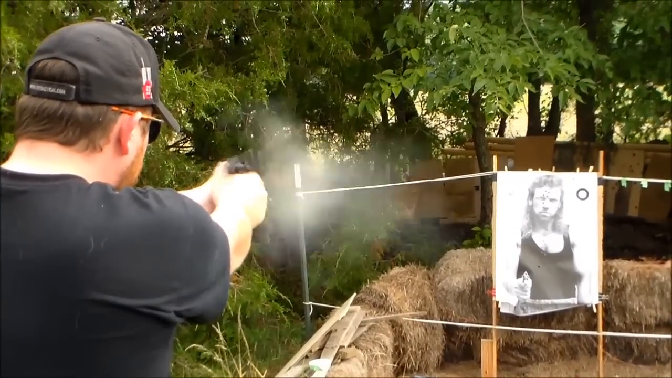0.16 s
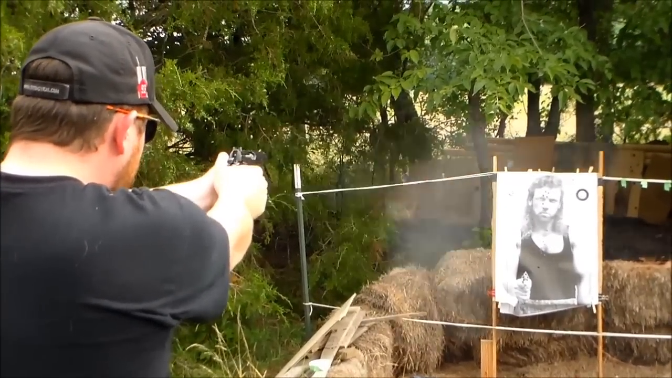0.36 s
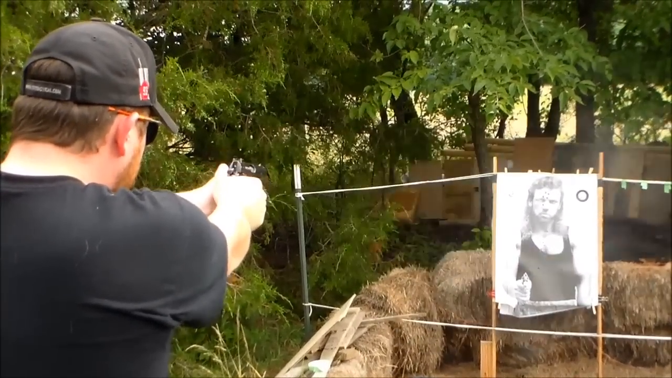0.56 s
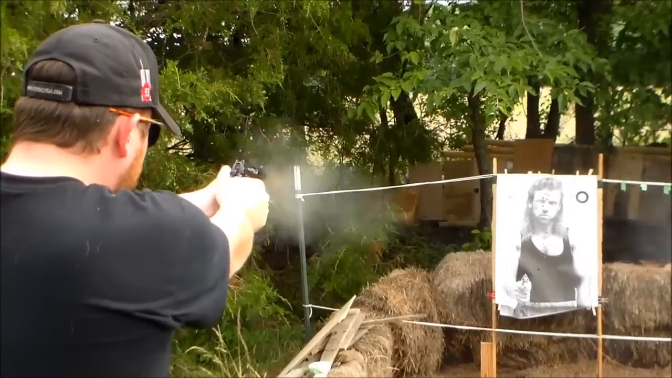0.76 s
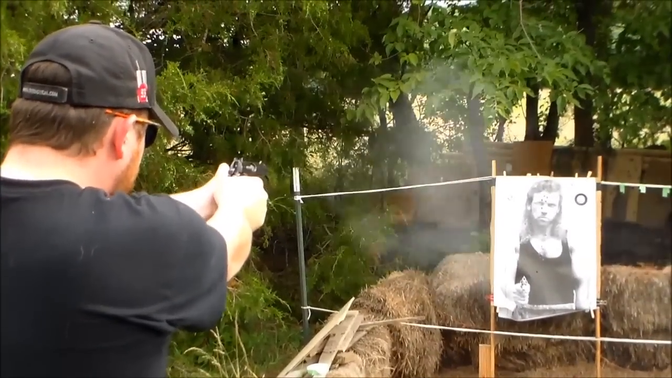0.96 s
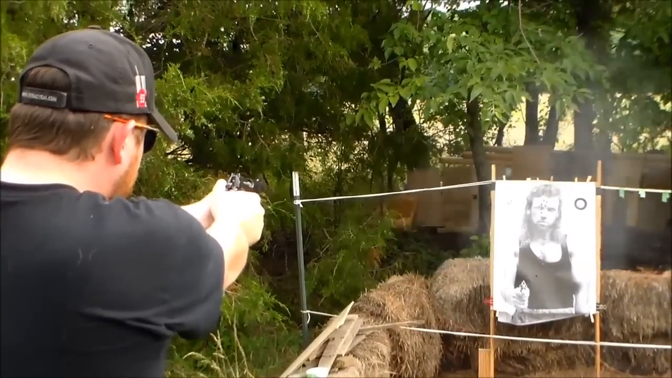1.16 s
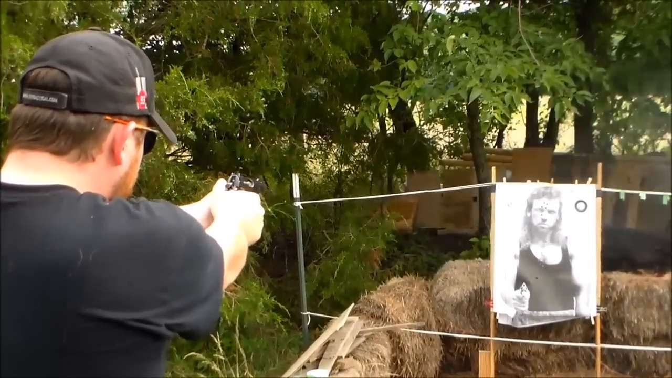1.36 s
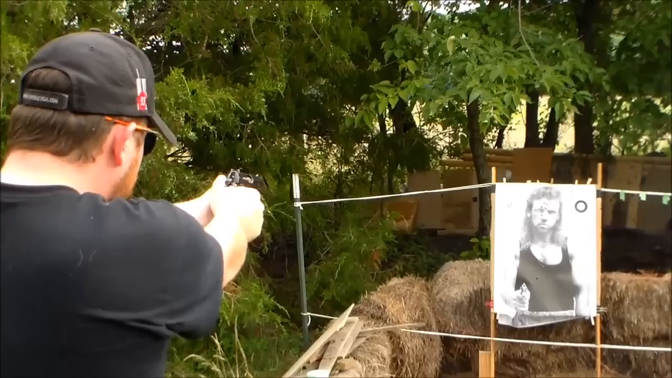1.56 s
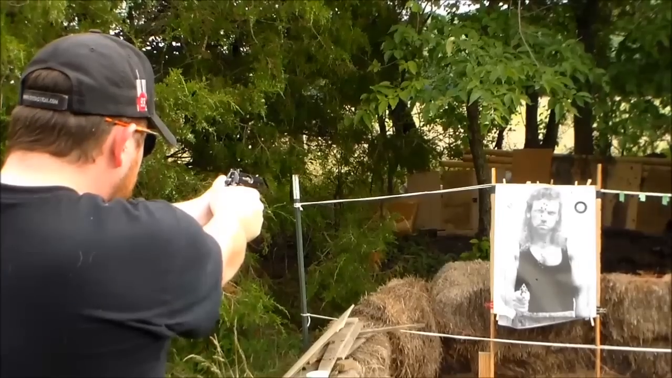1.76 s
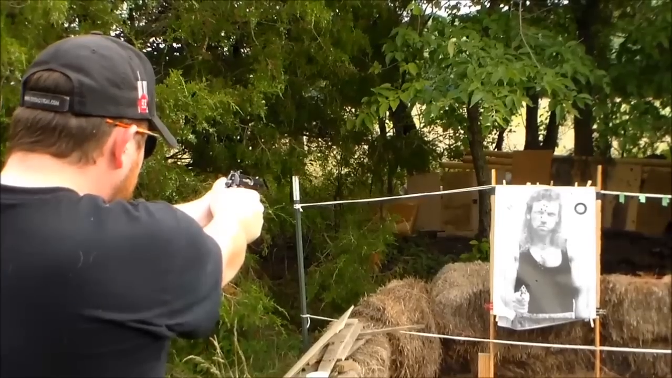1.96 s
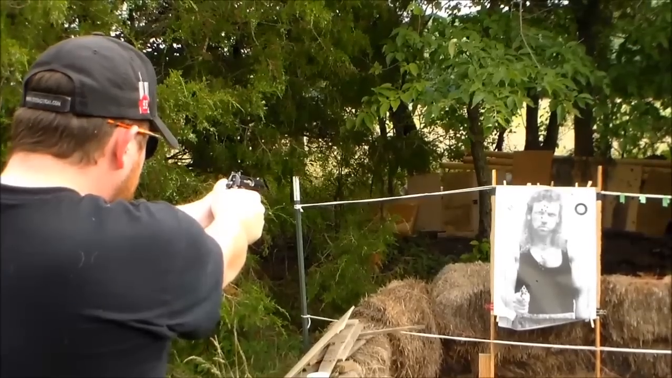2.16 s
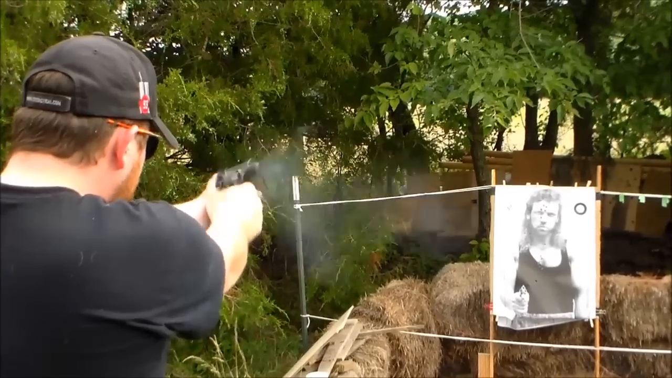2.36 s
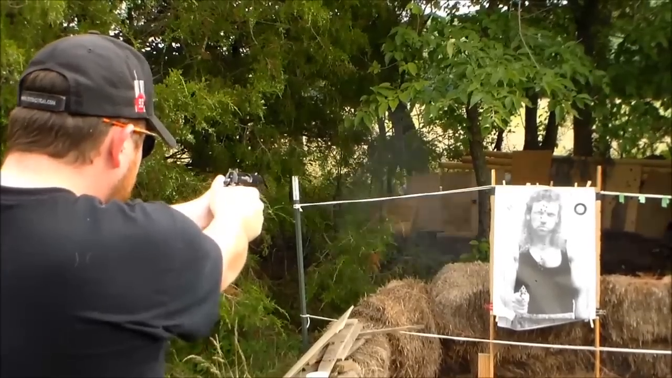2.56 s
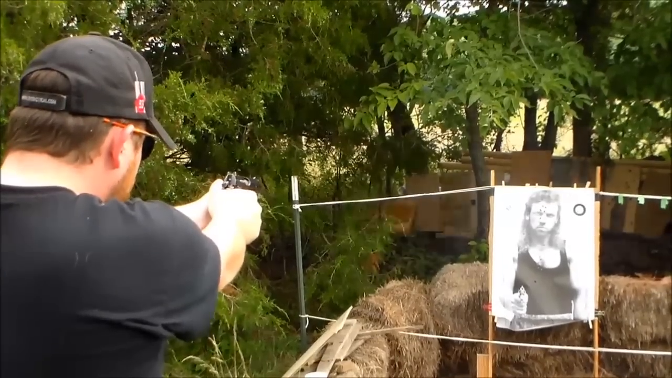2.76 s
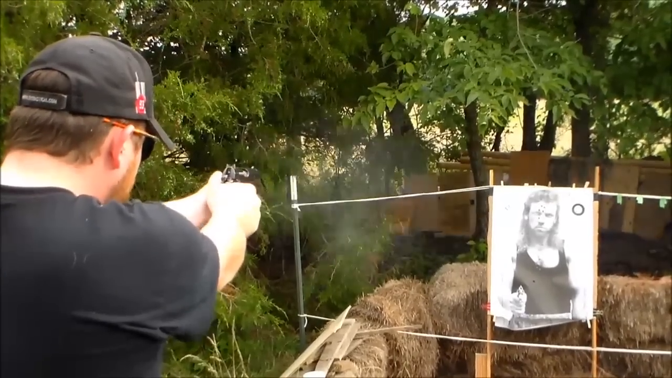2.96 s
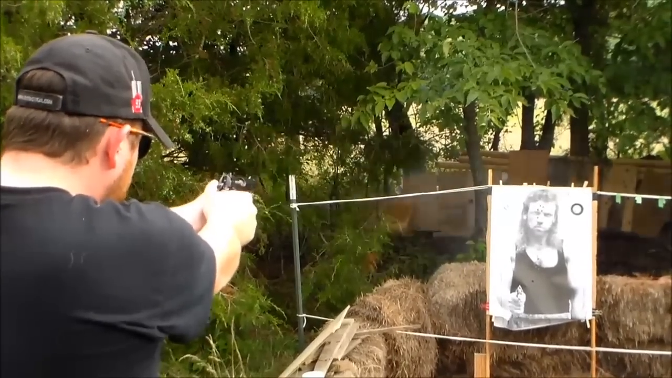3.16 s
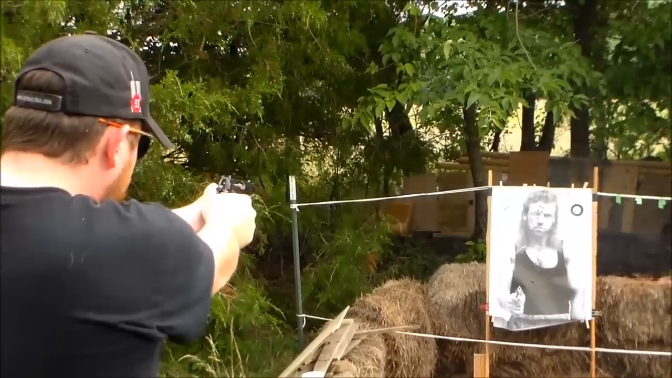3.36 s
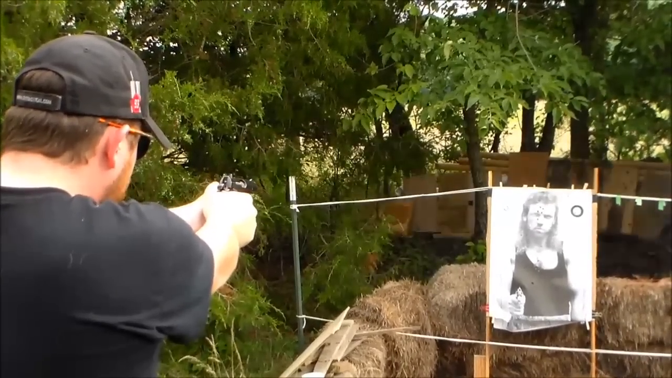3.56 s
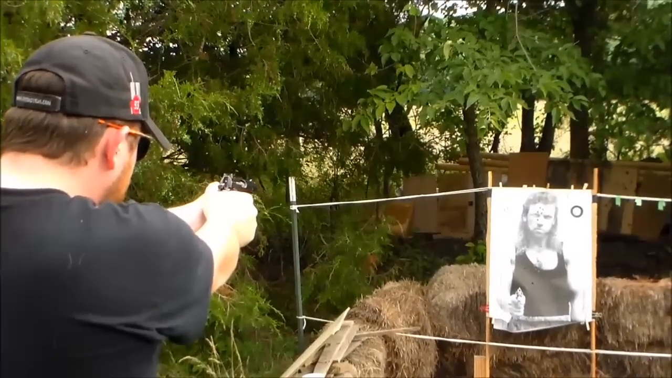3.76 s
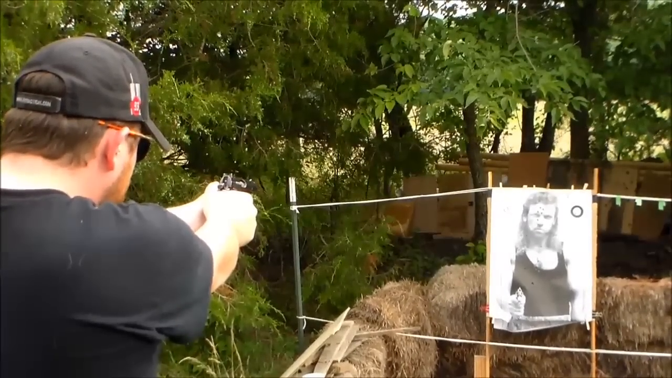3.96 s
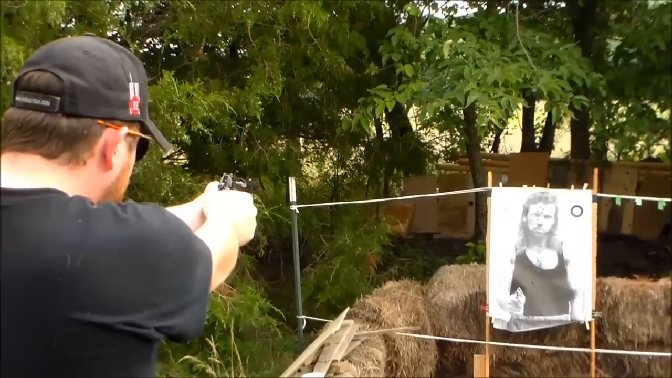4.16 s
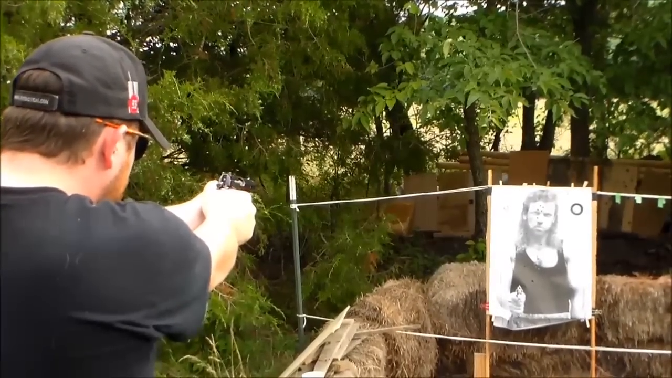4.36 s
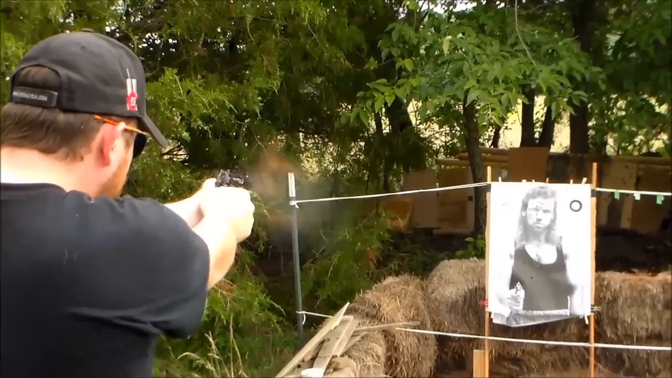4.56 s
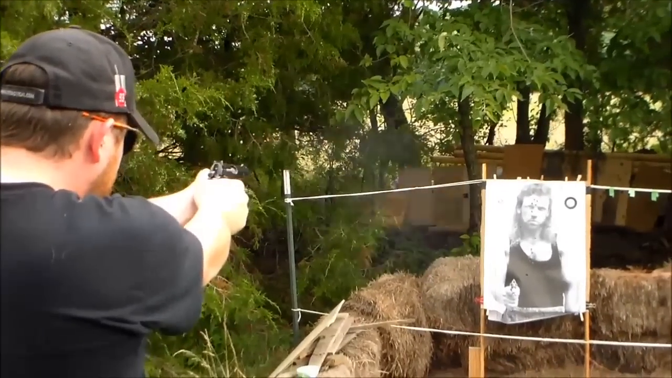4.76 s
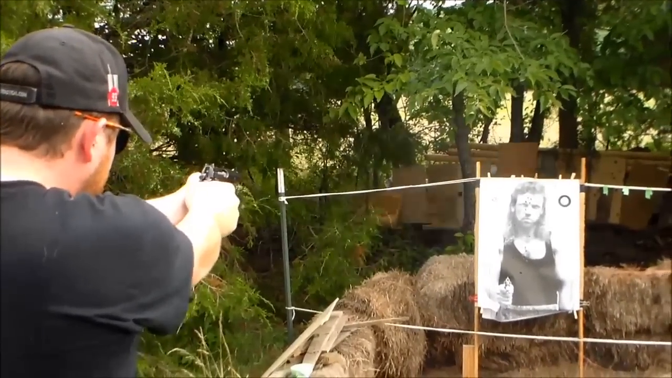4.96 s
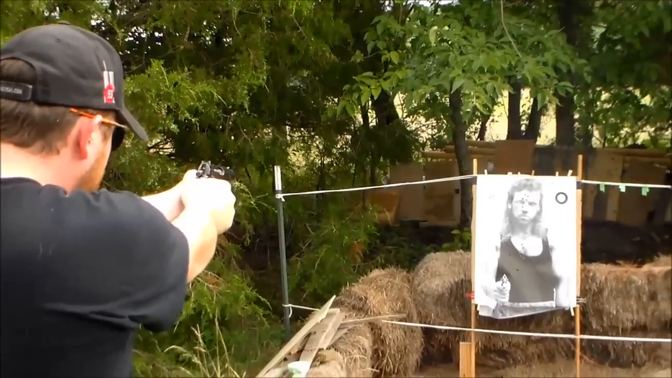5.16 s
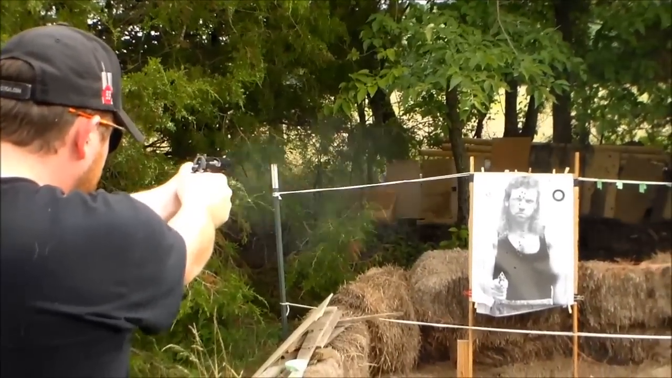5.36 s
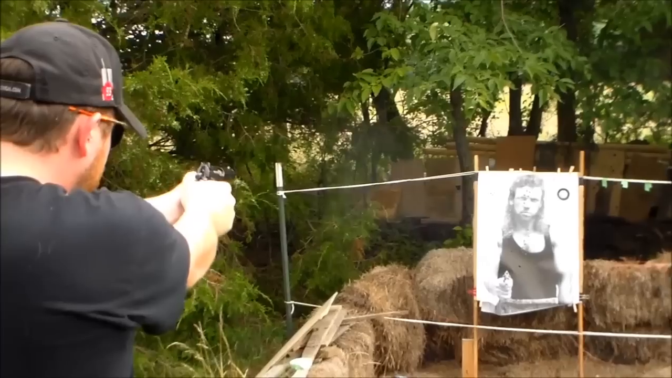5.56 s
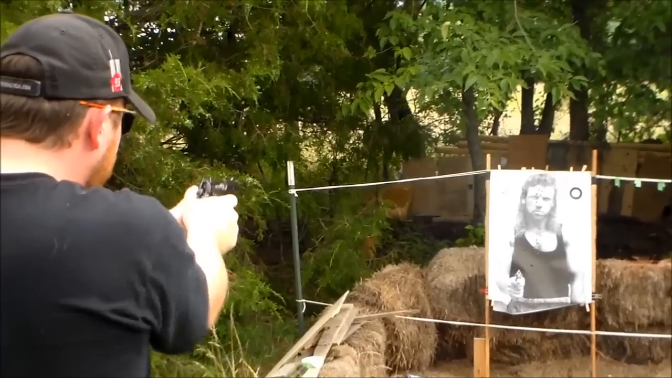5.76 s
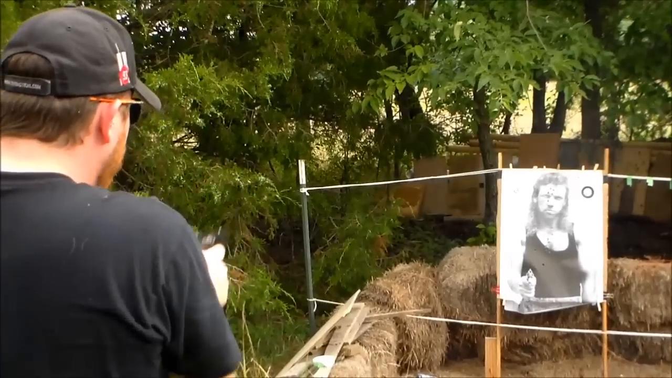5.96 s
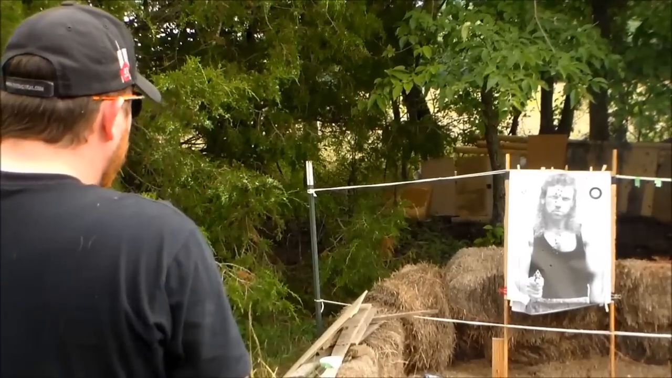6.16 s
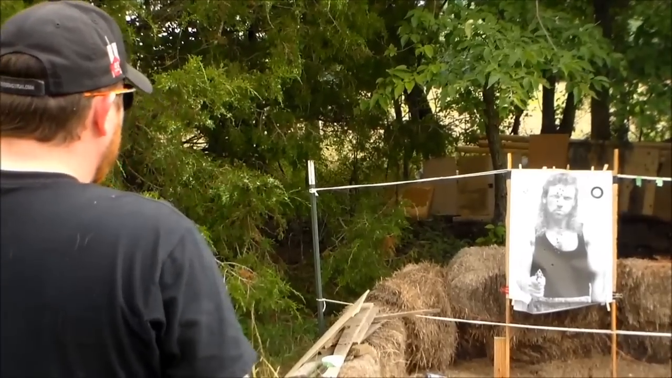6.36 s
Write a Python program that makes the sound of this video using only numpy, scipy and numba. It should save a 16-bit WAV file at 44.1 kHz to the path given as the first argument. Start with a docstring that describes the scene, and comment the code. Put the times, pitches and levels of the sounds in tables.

```python
"""Wind and summer hiss open the scene, then a pistol close to the microphone fires three pairs of shots outdoors.
Each blast, a boom plus thumps and noise cracks, overloads the microphone and slaps back from the target bank.
Coloured noise then scatters from trees and straw, rolls through distant woods and slaps off a far tree line.
The gain control ducks under the shots and lets go late, lifting far echo, wind and hiss; spent cases tinkle
in the gaps between pairs, and a last gust bumps the microphone."""
import sys
import numpy as np
from scipy import signal
from scipy.fft import rfft, irfft, next_fast_len
from scipy.io import wavfile
from numba import njit

SR = 44100
rng = np.random.default_rng(int(sys.argv[2]) if len(sys.argv) > 2 else 0)


def wrap_up_sound(samples):
    """Save the sound to the file named by the first command line argument, as 16-bit audio."""
    columns = np.atleast_2d(samples).T
    # keep every value between -1 and 1, then stretch to whole-number steps
    tamed = np.clip(columns, -1, 1)
    steps = np.round(tamed * 32767).astype(np.int16)
    wavfile.write(sys.argv[1], SR, steps)


N = 286473
TIME = np.arange(N) / SR  # s
ECHO_SIZE = 98304  # samples given to the echoes of one shot
DELAY = TIME[:ECHO_SIZE]  # s after a shot
PATH_DECAY_S = 0.0013  # decay of each arrival of the blast

# Stereo spread at the two close microphone ports. Each row: frequency in Hz, side minus mid in dB.
PORT_WIDTH = [(60, -18), (200, -10), (400, -15), (750, -19), (1300, -14.5), (2400, -12.5), (4400, -5),
              (8000, 3.5), (14000, -1)]


def undb(db):
    """Decibels to gain."""
    return 10 ** (np.asarray(db) / 20)


def at_hz(points, hz):
    """Read (Hz, value) points on a log-frequency axis."""
    f, value = np.transpose(points)
    return np.interp(np.log(hz), np.log(f), value)


def add(out, sound, s):
    """Mix a sound in from time s on."""
    start = max(int(round(s * SR)), 0)
    part = sound[..., :max(out.shape[1] - start, 0)]
    out[:, start:start + part.shape[-1]] += part


def waver(t, size):
    """Random levels, a new one every size samples, joined by straight lines."""
    knots = t[::size]
    return np.interp(t, knots, rng.standard_normal(len(knots)))


def swell(onset_s, build_s, top_db, fade_db_per_s):
    """Envelope of scattered sound: a straight rise, then an even fade."""
    age = DELAY - onset_s
    rise = np.clip(age / build_s, 0, 1)
    return rise * undb(top_db - fade_db_per_s * np.maximum(age - build_s, 0))


def noise(colour, size, width=None):
    """Stereo noise of a given colour, its mid at rms 1; without a width the two ports are unrelated."""
    length = next_fast_len(size, True)
    hz = np.maximum(np.fft.rfftfreq(length, 1 / SR), 1)
    gain = undb(at_hz(colour, hz))
    mid, side = rfft(rng.standard_normal((2, length))) * gain / np.sqrt(np.mean(gain ** 2))
    if width is not None:
        side = side * undb(at_hz(width, hz))
    return irfft(np.array([mid + side, mid - side]), length)[:, :size]


def burst(colour, db, spread_s):
    """A puff of coloured noise that peaks after spread_s (at least 0.5 ms) and fades."""
    age = TIME[:SR // 5] / max(spread_s, .0005)
    return undb(db) * noise(colour, len(age), PORT_WIDTH) * age * np.exp(1 - age)


def scatter(envelope, colour, loss, typical_s):
    """Countless small reflections whose colour shifts with travel time; it is as given at typical_s."""
    hz = np.maximum(np.fft.rfftfreq(ECHO_SIZE, 1 / SR), 1)
    spectrum = rfft(noise(colour, ECHO_SIZE, PORT_WIDTH))
    corners_hz = np.array(loss)[:, 0]
    out = 0
    # overlapping bands, one around each corner, each fading at its own rate
    for (_, db_per_s), own in zip(loss, np.eye(len(loss))):
        band = at_hz(np.column_stack([corners_hz, own]), hz)
        out = out + irfft(spectrum * band) * undb(-db_per_s * (DELAY - typical_s))
    return out * envelope


def summer_hiss():
    """Insects and foliage blend into a steady coloured noise, unrelated at the two ports."""
    # Colour of the hiss. Each row: frequency in Hz, relative level in dB.
    colour = [(200, -10.5), (500, -0.5), (1000, -1.5), (2200, -8.5), (2800, -8), (3300, -1), (4000, -8),
              (5400, -6), (7000, -16), (10000, -18), (14000, -18)]
    return undb(-62) * noise(colour, N)


def wind():
    """Eddies rumble at each port, louder in the gusts; now and then one bumps the microphone."""
    # Colour of the rumble. Each row: frequency in Hz, relative level in dB.
    colour = [(20, -2), (50, 1), (100, -0.5), (170, -5.5), (260, -18), (400, -26.5), (800, -46),
              (2000, -63)]
    # Gusts over the breeze. Each row: start in seconds, length in seconds, level in dB before flutter.
    gusts = [(0, 0.33, -44), (1.993, 0.78, -47), (4.06, .74, -50), (6.151, .4, -42)]
    # Single bumps. Each row: start in seconds, level in dB, upper edge in Hz.
    bumps = [(.172, -37.5, 244), (2.221, -34, 200), (2.317, -36.5, 195), (6.236, -31.5, 400),
             (6.285, -34, 405), (6.404, -29.5, 300), (6.460, -33, 415), (6.478, -35.5, 297)]
    breeze_db, gust_rise_s, flutter_db = -53, 0.017, 4
    strength = undb(breeze_db)
    for start, length, db in gusts:
        inside = np.minimum(TIME - start, start + length - TIME)
        gust = undb(db) * np.clip(inside / gust_rise_s + .5, 0, 1)
        strength = np.maximum(strength, gust)
    out = noise(colour, N) * strength * undb(flutter_db * waver(TIME, size=900))
    for s, db, hz in bumps:
        bump_colour = [(hz / 4, -3), (hz, 0), (2 * hz, -22), (10 * hz, -70)]
        add(out, burst(bump_colour, db, spread_s=0.0045), s)
    return out


def cases():
    """Spent cases tinkle on the ground: brief puffs of high-pitched noise."""
    # Landings. Each row: start in seconds, level in dB.
    landings = [(2.168, -53), (4.305, -60)]
    # Colour of the tinkle. Each row: frequency in Hz, relative level in dB.
    colour = [(5000, -35), (8000, -14), (10000, 0), (13000, -6), (15000, 3)]
    out = np.zeros((2, N))
    for s, db in landings:
        add(out, burst(colour, db, spread_s=0.0022), s)
    return out


def woods(patchy_db=1.58):
    """The blast rolls around the distant woods; a far tree line returns slaps, some dulled among the leaves."""
    # The roll: first arrival in seconds, build-up in seconds, top in relative dB, common fade in dB per s.
    roll = (0.1783, 0.12, -25.5, 26.5)
    # Colour of the roll. Each row: frequency in Hz, relative level in dB.
    roll_colour = [(150, -30.5), (250, -9), (309, -13), (609, 3.5), (991, 1), (1090, 1.5), (1960, -11.5),
                   (2450, -9), (4050, -19.5), (4470, -24), (5790, -28.5), (6480, -33.5), (12000, -54),
                   (15600, -75), (22000, -120)]
    # Loss in the air on top of the common fade. Each row: frequency in Hz, loss in dB per s.
    air_loss = [(500, -17.5), (1000, -6.5), (3000, -4.5), (10000, 6.5)]
    # Far slaps. Each row: delay in seconds, relative level in dB, spread in seconds, share of treble kept 0-1.
    slaps = [(0.786, -38, 0.0098, 0.5), (0.8109, -26, 0.0009, 0.93), (0.853, -42, 0.0084, 1),
             (.8685, -26.5, .0011, 0), (0.877, -26.5, 0.0009, 0.11)]
    # Colour of an undulled slap. Each row: frequency in Hz, relative level in dB.
    slap_colour = [(300, -17), (700, -6), (1100, 17.5), (1900, -15), (2550, 9), (3500, 1), (5200, -1.5),
                   (7500, -17), (13000, -43)]
    out = scatter(swell(*roll), roll_colour, air_loss, typical_s=1.0)
    out = out * undb(patchy_db * waver(DELAY, size=500))
    for delay, db, spread, treble in slaps:
        dulling_db = 20 * np.log10(np.clip(treble, .05, 1))
        dulled = [(hz, level + dulling_db * (hz > 3000)) for hz, level in slap_colour]
        add(out, burst(dulled, db, spread), delay)
    return out


def trees(patchy_db=2.5, clumps_db=1.25):
    """Ground and near trees scatter unevenly, in clumps, with a hollow ring where reflections add in step."""
    # Ground, nearest trees and the stand behind them. Each row: first arrival in seconds,
    # build-up in seconds, top in relative dB, common fade in dB per s.
    scatterers = [(0, .009, 9.5, 319.5), (.044, 0.01, 6, 175), (0.089, .045, -3, 118)]
    # Colour of the scatter. Each row: frequency in Hz, relative level in dB.
    colour = [(88, -54), (150, -16.5), (286, -27.5), (352, -6.5), (387, -10.5), (525, -1.5), (659, 0.5),
              (797, -1), (1490, -2), (2020, -4), (2900, -5.5), (5630, -12), (6810, -17.5), (10900, -17.5),
              (14000, -31)]
    # Loss among the leaves on top of the common fade. Each row: frequency in Hz, loss in dB per s.
    leaf_loss = [(500, 2.7), (1000, 9), (2500, 33), (5000, 59), (12000, 69)]
    # Pitches that the reflectors' spacing reinforces or cancels.
    # Each row: frequency in Hz, width in Hz (20 at least is used), boost or cut in dB.
    reinforced = [(390, 24, -2), (534, 110, 1), (600, 11, -2), (725, 18, 1.5), (890, 40, 1.5),
                  (1005, 12, -5), (1051, 6.3, -2.5), (1010, 47, 3), (1290, 50, -0.5), (1250, 19, 2.5),
                  (1502, 8, -1), (1690, 26, -0.5), (2037, 210, -6.5), (2510, 37, 5), (3100, 17, -0.5),
                  (3496, 50, 8)]
    hz = np.fft.rfftfreq(ECHO_SIZE, 1 / SR)
    ring_db = sum(db / (1 + (2 * (hz - f) / max(width, 20)) ** 2) for f, width, db in reinforced)
    uneven = undb(patchy_db * waver(DELAY, size=60) + clumps_db * waver(DELAY, size=300))
    envelope = np.sqrt(sum(swell(*row) ** 2 for row in scatterers)) * uneven
    near = scatter(envelope, colour, leaf_loss, typical_s=0.037)
    return irfft(rfft(near) * undb(ring_db)) * (DELAY < 1)


def bales():
    """Straw bales scatter the blast into a short, bright rustle of noise."""
    # Colour of the rustle. Each row: frequency in Hz, relative level in dB.
    colour = [(200, -7.5), (1000, 1), (5000, -1.5), (14000, -7.5)]
    # The rustle: first arrival in seconds, build-up in seconds, top in relative dB, fade in dB per s.
    rustle = (0.025, 0.0034, 4.8, 300)
    return noise(colour, ECHO_SIZE, PORT_WIDTH) * swell(*rustle)


def echoes():
    """Spectrum of all that the range throws back after one shot."""
    return rfft(trees() + bales() + woods())


def thump(hz, db, decay_s):
    """A short, damped pressure oscillation."""
    t = TIME[:SR // 25]
    return undb(db) * np.cos(2 * np.pi * hz * t) * np.exp(-t / decay_s)


def reflection(thump_db, hz, crack_db, narrow_db=-5):
    """One arrival of the blast: a thump and a burst of crack, nearly alike at both ports."""
    # Colour of the crack. Each row: frequency in Hz, relative level in dB.
    colour = [(60, 7), (300, 0.5), (1300, 11.5), (2000, 1.5), (3400, 8), (6000, -1), (10000, -2.5),
              (15000, -22)]
    t = TIME[:SR // 25]
    width = [(f, db + narrow_db) for f, db in PORT_WIDTH]
    crack = undb(crack_db) * noise(colour, len(t), width) * np.exp(-t / PATH_DECAY_S)
    return thump(hz, thump_db, PATH_DECAY_S) + crack


def blast():
    """The muzzle booms; the blast arrives directly, off the ground, the target bank and a few near trunks."""
    # Low boom of the muzzle gas. Each row: frequency in Hz, relative level in dB, decay in seconds.
    boom = [(188, 13.5, 0.0044), (340, 23, .0035)]
    # The direct blast and its distinct near reflections. Each row: delay in seconds,
    # thump relative level in dB, thump frequency in Hz, crack relative level in dB.
    paths = [(0, 21, 1430, 39.5), (.0020, 24.5, 967, 24.5), (.0043, 22.5, 760, 33.5),
             (.0313, 32.5, 590, 7.5), (.0330, 22, 1034, 17.5), (.0600, 12.5, 1430, 7),
             (.0910, 7.5, 520, -4.5), (.1165, 9.5, 905, 1)]
    out = np.zeros((2, ECHO_SIZE))
    add(out, sum(thump(hz, db, decay_s) for hz, db, decay_s in boom), 0)
    for delay, thump_db, hz, crack_db in paths:
        add(out, reflection(thump_db, hz, crack_db), delay)
    return out


def surge(rise_s, onset_s=0.0062, length_s=0.047, coupling_hz=1.66):
    """The blast throws the microphone off centre; its coupling capacitors swing it slowly back."""
    push = -(1 + np.tanh((DELAY - onset_s) / rise_s)) / 2 * np.exp(-(DELAY / length_s) ** 2)
    b, a = signal.butter(1, coupling_hz, "high", fs=SR)
    return signal.lfilter(b, a, signal.lfilter(b, a, push))


def pistol():
    """Gun and surroundings stay put, so every shot has the same low echoes; the blast and their treble vary."""
    # Shots. Each row: start in seconds, gain of blast and echoes in dB, microphone surge level in dB,
    # surge rise in seconds, surge left minus right in dB.
    shots = [(0.3412, 1.5, 19, .003, 5.5), (0.9528, 1.5, 16.5, .005, 3.5), (2.53, 1.5, 22.5, .0007, -2),
             (3.0810, 1, 19, .0009, 4), (4.7555, 1, 21, 0.00051, 0), (5.4907, 1.5, 18.5, .0015, 0)]
    stable_hz = 2450  # above it, moving air changes the echoes from shot to shot
    hz = np.fft.rfftfreq(ECHO_SIZE, 1 / SR)
    kept = 1 / np.sqrt(1 + (hz / stable_hz) ** 4)
    steady = kept * echoes()
    out = np.zeros((2, N))
    for s, blast_db, surge_db, rise_s, lean_db in shots:
        echo = irfft(steady + np.sqrt(1 - kept ** 2) * echoes())
        ports = undb(surge_db + np.array([[lean_db], [-lean_db]]) / 2)
        add(out, undb(blast_db) * (blast() + echo) + ports * surge(rise_s), s)
    return out


def scene():
    """Shots and falling cases over light wind and summer hiss."""
    return summer_hiss() + wind() + cases() + pistol()


@njit
def gain_control(peak, limit, least, hold, dead, release):
    """Drops at once on an overload, down to least; holds, timed from the first crest; then swells back."""
    gain, g, wait = np.empty(len(peak)), 1., 0.
    for i in range(len(peak)):
        if peak[i] * g > limit:
            g = max(limit / peak[i], least)
            # crests within the dead time do not restart the hold
            if wait < hold - dead:
                wait = hold
        if wait > 0:
            wait -= 1
        else:
            g += g * (1 - g) / release
        gain[i] = g
    return gain


def record(dry):
    """Gain control, a preamplifier that clips flat, its own hiss, and the top cut."""
    # Colour of the preamplifier's noise. Each row: frequency in Hz, relative level in dB.
    preamp_colour = [(20, 25.5), (100, 21.5), (300, 6), (1000, -0.5), (14000, -2)]
    duck_db, hold_s, dead_s, release_s = -24, 0.64, .1, 0.039
    clip_level, self_noise_db, top_hz = 0.46, -70.5, 14200
    peak = np.abs(dry).max(axis=0)
    least = float(undb(duck_db))
    gain = gain_control(peak, 0.8, least, float(hold_s * SR), float(dead_s * SR), float(release_s * SR))
    clipped = np.clip(dry * gain, -clip_level, clip_level)
    hiss = undb(self_noise_db) * noise(preamp_colour, N)
    top_cut = signal.ellip(10, .2, 70, top_hz, fs=SR, output="sos")
    return signal.sosfilt(top_cut, clipped + hiss)


dry = scene()
out = record(dry)
wrap_up_sound(out)
```